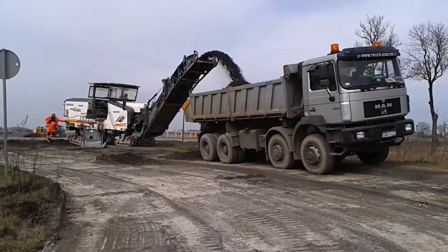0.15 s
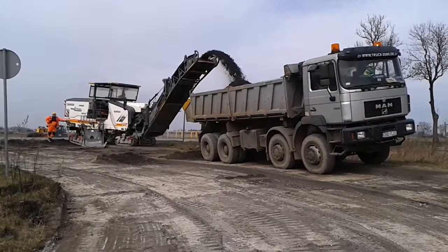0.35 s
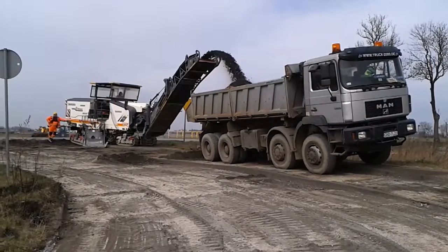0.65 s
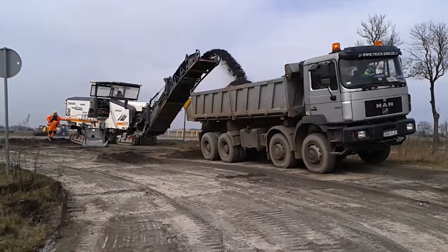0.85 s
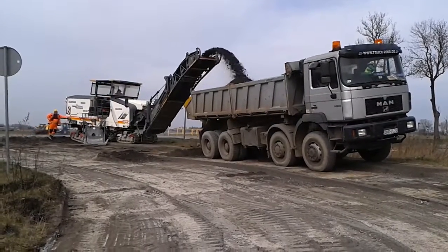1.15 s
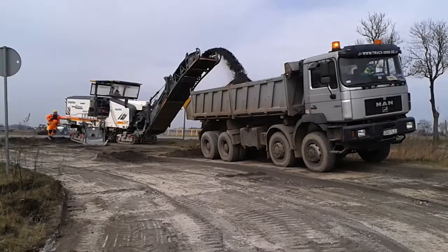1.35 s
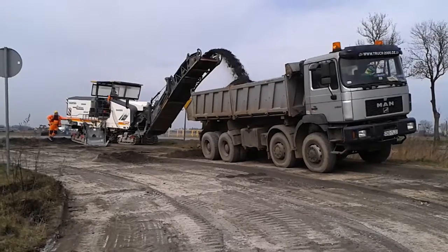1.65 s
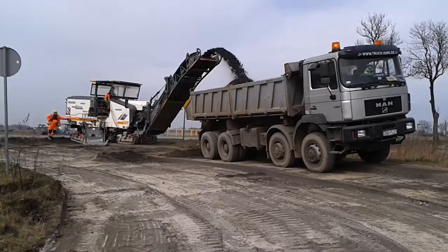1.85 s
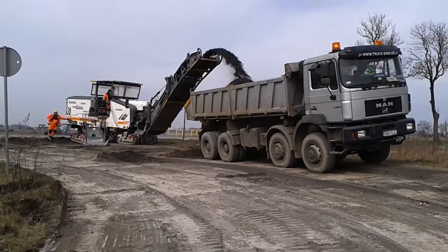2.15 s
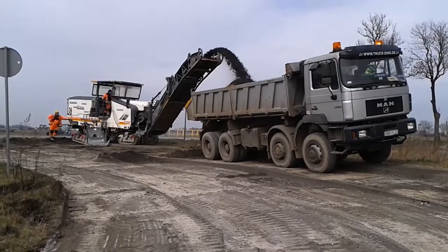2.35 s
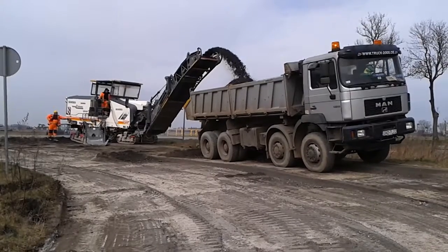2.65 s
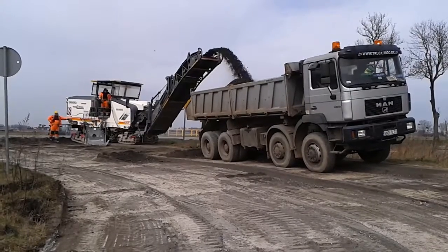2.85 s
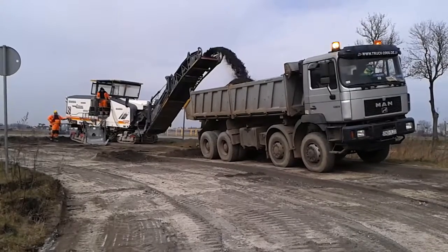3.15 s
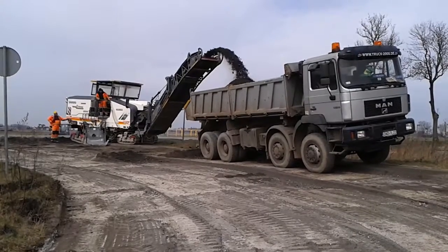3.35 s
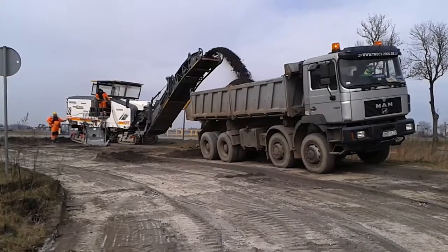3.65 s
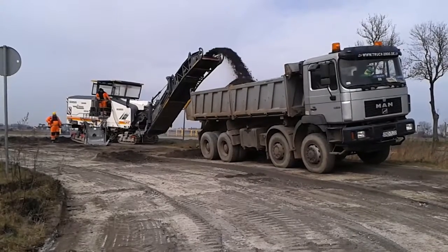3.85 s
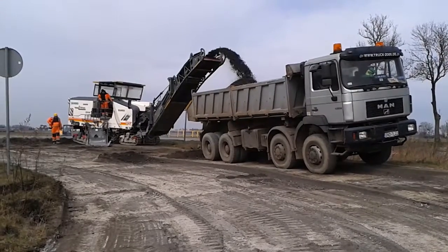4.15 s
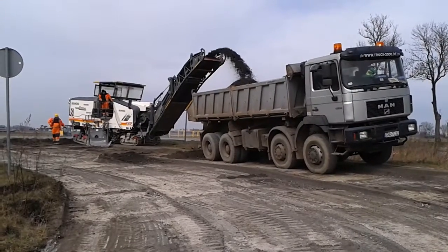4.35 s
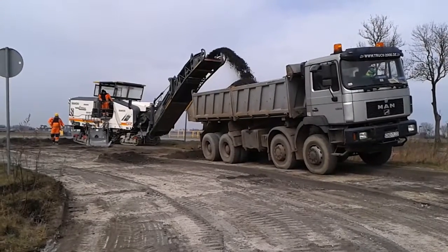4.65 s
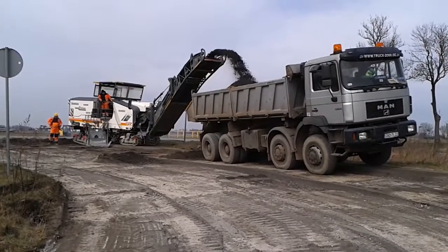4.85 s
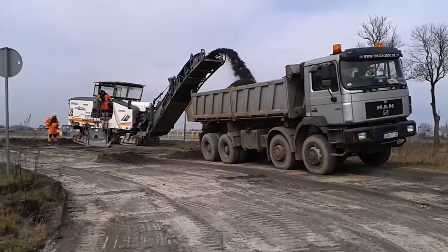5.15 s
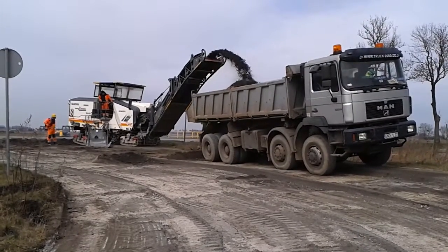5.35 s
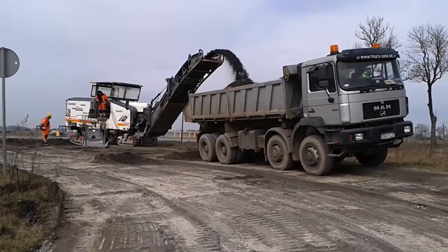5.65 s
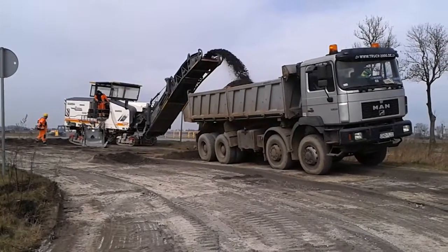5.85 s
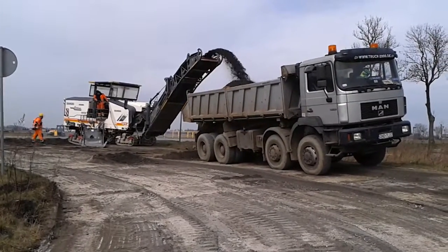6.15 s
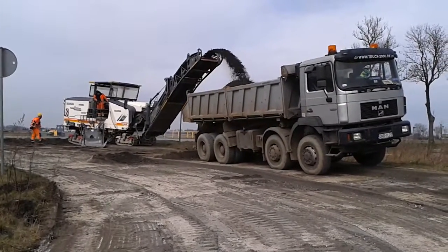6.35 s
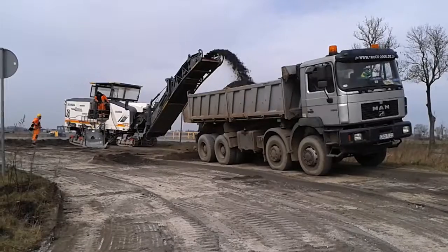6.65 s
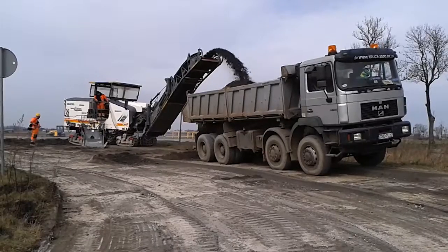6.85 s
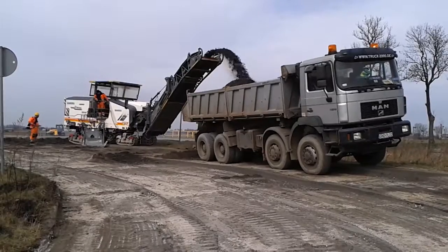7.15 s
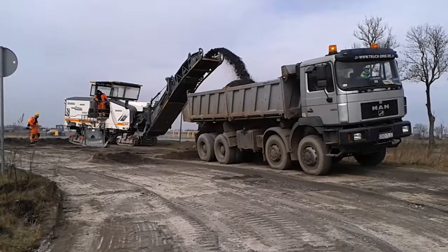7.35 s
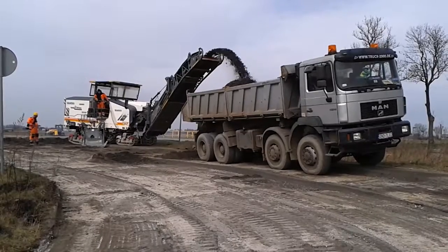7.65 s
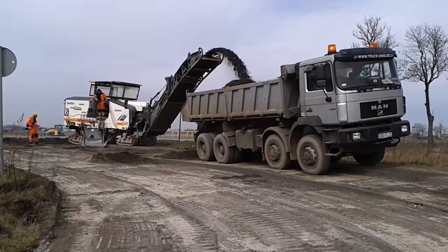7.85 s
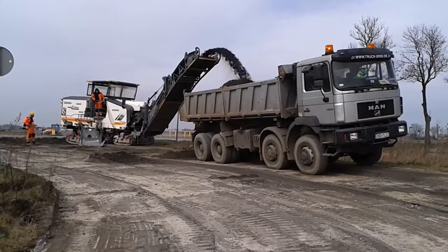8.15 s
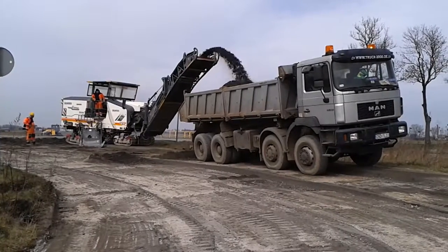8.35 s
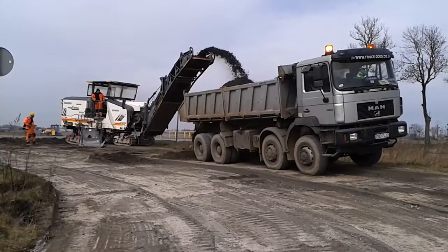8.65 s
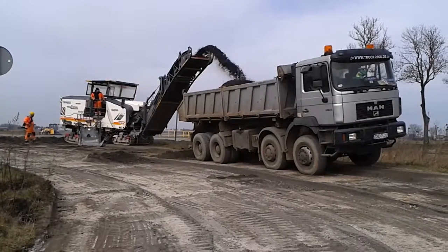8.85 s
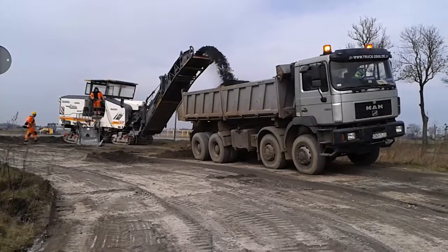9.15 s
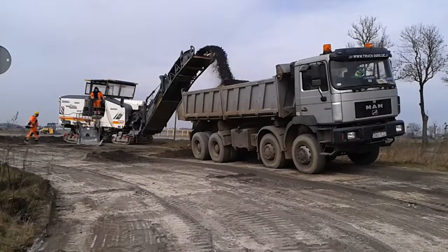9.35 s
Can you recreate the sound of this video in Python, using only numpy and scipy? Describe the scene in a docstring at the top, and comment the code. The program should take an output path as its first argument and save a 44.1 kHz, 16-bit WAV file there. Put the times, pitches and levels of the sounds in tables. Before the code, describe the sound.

Outdoors at a roadworks, a milling machine some way off grinds asphalt with a dense, steady roar and metallic housing ring. A diesel drones inside it while rubble rattles off a belt into a truck idling low. Air hisses up from about one second and cuts off before two; later small stones tick on the steel bed, with one hard crack near seven seconds. One fixed distant microphone, mono.

```python
"""The roar of a cutting drum is heard first, with a diesel droning inside it and rubble rattling off a belt:
a road milling machine, some way off, grinds asphalt and pours it into an idling truck.
Drum and rubble are shaped noise with sparse bursts; the engine and hums are wavering sines.
Air hisses for a moment as a swelling band of noise, and a few stones crack on the steel bed as decaying modes.
"""
import sys
import numpy as np
from scipy import signal
from scipy.fft import rfft, irfft, next_fast_len
from scipy.io import wavfile
from scipy.ndimage import uniform_filter1d

SR = 44100
rng = np.random.default_rng(int(sys.argv[2]) if len(sys.argv) > 2 else 0)


def inscribe(sig):
    """Save sig as 16-bit PCM at rate SR to the path in sys.argv[1].

    A 1-D sig is mono; a 2-D sig holds one channel per row.
    Samples are clipped to [-1, 1] before scaling.
    """
    pcm = np.round(np.clip(np.atleast_2d(sig).T, -1, 1) * 32767)
    wavfile.write(sys.argv[1], SR, pcm.astype(np.int16))


N = 419391  # length in samples

# The drum at work: columns [t/s, low roar level/dB, housing ring level/dB]
DRUM_LEVELS = [(0, -20, -27), (2, -20, -26.5), (4.3, -20.5, -28), (5.5, -21, -27), (7.5, -20, -28),
               (9.51, -21, -27.5)]
# Spectrum of the low roar before panel resonance: columns [f/Hz, relative level per Hz/dB]
ROAR_SPECTRUM = [(30, -47.5), (40, -39), (50, -17.5), (97, -2.5), (140, -2), (172, 1), (275, -2.5),
                 (400, -8.5), (586, -18), (731, -23.5), (822, -15.5), (900, -22.5), (1170, -41.5),
                 (1980, -120)]
# Spectrum of the housing before panel resonance: columns [f/Hz, relative level per Hz/dB]
HOUSING_SPECTRUM = [(350, -42.5), (600, -5), (735, -6.5), (826, -2.5), (1040, 2), (1220, -7), (1430, -3),
                    (1760, -10.5), (1960, -7), (2150, -13.5), (2490, -12.5), (3070, -22.5), (3400, -24),
                    (4420, -50), (7480, -120)]
LURCH_DB, LURCH_HZ = 0.57, 7.9  # the roar lurches as the cut gets harder and softer


def drum():
    """Broadband excitation: teeth bite too densely to count, and the housing panels resonate."""
    roar_db, ring_db = follow(DRUM_LEVELS)
    roar = coloured(rng.standard_normal(N), lambda hz: read(ROAR_SPECTRUM, hz) + panel_lift(hz))
    bites = gain_of(-10.5) * knocks(per_s=150, spread_db=2.7, samples=140.0)
    teeth = patchy(patch_db=0.04, flicker_db=0.13) + bites
    ring = coloured(teeth, lambda hz: read(HOUSING_SPECTRUM, hz) + panel_lift(hz))
    lurching_db = roar_db + LURCH_DB * drift(LURCH_HZ).real
    return swaying(gain_of(lurching_db) * roar + gain_of(ring_db) * ring)


# Resonances of the housing and the belt frame: columns [f/Hz, width/Hz, lift/dB]
PANEL_RESONANCES = [(156, 8, -1), (254, 24, 2.5), (330.5, 12, 2), (382, 17, 3), (542, 27, 2.5),
                    (850, 25, 0), (965, 68, 3), (1068, 36, 3.5), (1180, 29, 0.5), (1440, 48, 2),
                    (1666, 49, 2.5), (1703, 41, 3.5), (1920, 80, 4.5), (1820, 55, 2), (2036, 68, 2.5),
                    (2343, 84, 5), (2572, 74, 5), (2890, 45, 7.5), (3227, 49, 4.5), (3660, 120, 1.5),
                    (4270, 140, 1.5), (4740, 90, 4), (5370, 170, -1.5), (5960, 130, -3)]
SWAY_DB, SWAY_FRAMES = 1.0, 5  # rms sway of each ring, and its averaging time in spectral frames


def panel_lift(hz):
    """Resonance: each panel lifts the spectrum in dB around its own frequency."""
    return sum(lift / (1 + (2 * (hz - f) / width) ** 2) for f, width, lift in PANEL_RESONANCES)


def swaying(x):
    """Time-varying resonance: every panel ring swells and fades by chance as the load shifts."""
    hz, t, spectrum = signal.stft(x, SR, nperseg=2048)
    chance = rng.standard_normal((len(t), len(PANEL_RESONANCES)))
    sway = evened(uniform_filter1d(chance, size=SWAY_FRAMES, axis=0))
    shapes = np.array([1 / (1 + ((hz - f) / width) ** 2) for f, width, _ in PANEL_RESONANCES])
    gain = gain_of(SWAY_DB * sway @ shapes).T
    return signal.istft(spectrum * gain, SR, nperseg=2048)[1][:N]


# Machine diesel under its governor: columns [t/s, shaft speed/turns per s]
SHAFT_SPEED = [(0, 35.15), (1.75, 35.35), (2.75, 35.2), (3.75, 35.5), (4.75, 35.15), (5.5, 34.68),
               (6.9, 34.65), (7.75, 35.2), (8.75, 35.38), (9.51, 35.3)]
# Orders of the shaft: columns [multiple of shaft speed, level relative to FIRING_DB/dB]
ORDER_LEVELS = [(3, -3), (4, -6.5), (4.5, -12), (5, -3.5), (6, -7.5), (6.5, -11), (7.5, -12), (8, -7.5),
                (9.5, -15), (12, -19), (18, -21), (20, -24), (24, -20)]
FIRING_DB = -28.5  # rms reference, before the waver
WAVER_PER_ORDER, WAVER_MOST, WAVER_HZ = 0.17, .65, 7  # depth grows with order up to a limit


def diesel():
    """Order analysis: sines at shaft multiples; uneven combustion wavers their level and phase."""
    turns = shaft_turns()
    orders = 0
    for multiple, db in ORDER_LEVELS:
        depth = min(WAVER_PER_ORDER * multiple, WAVER_MOST)
        waver = 1 + depth * drift(WAVER_HZ)
        tone = np.exp(2j * np.pi * (multiple * turns + rng.random()))
        orders = orders + gain_of(db) * (waver * tone).real
    return np.sqrt(2) * gain_of(FIRING_DB) * orders


def shaft_turns():
    """Phase accumulation: the integral of shaft speed, in turns."""
    speed, = follow(SHAFT_SPEED)
    return np.cumsum(speed) / SR


# Rubble flow off the belt: columns [t/s, level/dB, gain of the top treble/dB]
FLOW_LEVELS = [(0, -35, -5), (1.2, -34, -18.5), (2.2, -35.5, -4), (4.3, -36, 3), (4.9, -35.5, -0.5),
               (6.6, -37, 4.5), (9.0, -36, -1), (9.51, -36, 3)]
# Spectrum of the rubble before panel resonance: columns [f/Hz, relative level per Hz/dB]
RUBBLE_SPECTRUM = [(1800, -31), (3000, -12.5), (3470, -10.5), (3810, -4), (4840, -3), (6180, -0.5),
                   (6600, -3), (8300, -18), (9000, -26), (9300, -39), (9700, -36.5), (14000, -75)]
CLATTER_DEPTH = .045  # the rattle throbs with each turn of the shaft


def rubble():
    """Dense random impacts: a patchy rattle with sparser, sharper chips; its top treble flickers."""
    level_db, top_db = follow(FLOW_LEVELS)
    chips = gain_of(-8.0) * knocks(per_s=250, spread_db=5.0, samples=80.)
    fall = patchy(patch_db=0.7, flicker_db=0.6) + chips
    rattle = coloured(fall, lambda hz: read(RUBBLE_SPECTRUM, hz) + panel_lift(hz))
    rattle = rattle * (1 + CLATTER_DEPTH * np.cos(2 * np.pi * shaft_turns()))
    high_pass = signal.butter(4, 7600, "high", fs=SR, output="sos")
    top = signal.sosfiltfilt(high_pass, rattle)
    top_gain = gain_of(top_db + 3.0 * drift(20).real)
    return gain_of(level_db) * (rattle + (top_gain - 1) * top)


# Stones on the steel bed: columns [t/s, peak level of the clack/dB, pitch factor]
STONE_BLOWS = [(2.247, -25, 1.04), (3.007, -26, 1.03), (3.343, -24, 1.04), (3.573, -26, 1.12),
               (3.578, -25, 1.08), (3.765, -25, .92), (4.149, -26, .9), (4.465, -23, 1.1),
               (4.472, -24, .98), (5.279, -25, 1.1), (6.832, -19, 1.08), (6.837, -20, 1.12),
               (6.842, -18, 1.04), (6.849, -23, 1.15), (7.0314, -17, 1.02), (7.0331, -7, 1.0),
               (7.0371, -11, 1.0), (7.0428, -17, 1.02), (7.2572, -21, 1.12), (7.265, -25, 1.1),
               (7.55, -23, 1.06), (7.961, -28, 1.15), (9.355, -25, .94), (9.491, -19.5, 1.03)]
# Modes of the steel bed before the pitch factor: columns [f/Hz, relative level/dB, t60/s]
BED_MODES = [(2050, -13, .012), (2380, -9, .02), (2800, -6, .02), (3250, -12, .02), (3720, -11, .02),
             (4200, -18, .02), (5000, -9, .02), (5300, 0, .03), (5800, 0, .028), (6250, -7, .022),
             (6620, -7, .025), (7000, -10, .025), (7650, -15, .022), (9320, -24, .03)]
MIDDLE_HZ = 4500, 8500  # light stones sound mainly the modes in this range
HARD_DB = -8  # a blow this strong sounds all modes of the bed in full
SCATTER_DB, SCATTER_T60_S = -21, .095  # splinters: starting rms against the clack peak, and decay
RISE_S = .0004


def stones():
    """Modal synthesis: each stone rings the bed in a sharp clack; a patter of splinters follows."""
    size = 4096  # samples in one blow
    out, t, hz = np.zeros(N + size), np.arange(size) / SR, np.fft.rfftfreq(size, 1 / SR)
    f, mode_db, t60 = np.transpose(BED_MODES)[:, :, None]
    outer = (f < MIDDLE_HZ[0]) | (f > MIDDLE_HZ[1])
    rise = np.sin(np.pi / 2 * np.minimum(t / RISE_S, 1)) ** 2
    bursts = rng.standard_normal((len(STONE_BLOWS), size))
    for (s, db, factor), burst in zip(STONE_BLOWS, bursts):
        outer_gain = min(gain_of(0.98 * (db - HARD_DB)), 1)
        strength = gain_of(mode_db) * np.where(outer, outer_gain, 1)
        modes = strength * gain_of(-60 * t / t60) * np.sin(2 * np.pi * f * factor * t)
        clack = modes.sum(axis=0)
        # the splinters take their colour from the same modes
        colour = (strength / (1 + ((hz - f * factor) / 300) ** 4)).sum(axis=0)
        splinters = evened(irfft(rfft(burst) * colour, size))
        patter = splinters * gain_of(SCATTER_DB - 60 * t / SCATTER_T60_S)
        blow = rise * (clack / abs(rise * clack).max() + patter)
        out[round(s * SR):][:size] += gain_of(db) * blow
    return out[:N]


AIR_OPEN_S, AIR_SHUT_S, AIR_CLOSING_S = .9, 1.885, .015
AIR_DB, AIR_SWELL = -37.5, .6  # level just before shutting; power law of the swell


def air():
    """Jet noise: smooth hiss from a valve that swells and shuts at once."""
    times = [AIR_OPEN_S, AIR_SHUT_S, AIR_SHUT_S + AIR_CLOSING_S]
    opening = np.interp(np.arange(N) / SR, times, [0, 1, 0])

    def jet_db(hz):
        """Spectral shaping: a broad hump near 5200 Hz with a steep upper limit."""
        return -12 * np.log2((hz + 1) / 5200) ** 2 - 60 * (hz / 9000) ** 8

    hiss = coloured(rng.standard_normal(N), jet_db)
    return gain_of(AIR_DB) * opening ** AIR_SWELL * hiss


# Idling truck and low hums: columns [f/Hz, nominal level/dB, waver width/Hz]
HUM_TONES = [(50.7, -51, 1.4), (56.5, -47, 2), (59.8, -46.5, 2.2), (75, -38.5, 1.8), (481, -48, 4.1),
             (1076, -47, 15)]


def hums():
    """Narrow-band tones: each line is part clean sine, part wandering in level and phase."""
    t = np.arange(N) / SR
    total = 0
    for hz, db, width in HUM_TONES:
        waver = 1 + 0.89 * drift(width)
        tone = np.exp(2j * np.pi * (hz * t + rng.random()))
        total = total + gain_of(db) * (waver * tone).real
    return total


WIND_DB = -63  # faint low buffeting at the microphone


def wind():
    """Turbulent pressure: lumpy noise at the very bottom of the range."""
    rumble = coloured(rng.standard_normal(N), lambda hz: -np.minimum((hz / 45) ** 4, 80))
    return gain_of(WIND_DB) * abs(drift(1.5)) * rumble


def gain_of(db):
    """Level definition: decibels to an amplitude factor."""
    return 10 ** (np.asarray(db) / 20)


def evened(x):
    """Energy normalisation: scales to rms 1."""
    return x / np.sqrt(np.mean(x ** 2) + 1e-20)


def read(points, hz):
    """Spectral envelope: interpolates a spectrum table on a log-frequency axis."""
    f, value = np.transpose(points)
    return np.interp(np.log(hz + 1), np.log(f + 1), value)


def follow(rows):
    """Time envelope: the columns of a curve table at every sample."""
    s, *columns = np.transpose(rows)
    return [np.interp(np.arange(N) / SR, s, c) for c in columns]


def drift(hz):
    """Narrow-band random modulation: slow complex chance of rms 1 and the given bandwidth."""
    steps = rng.standard_normal((N // 64 + 2, 2)) @ [1, 1j]  # one step per 64 samples
    pole = np.exp(-np.pi * hz * 64 / SR)
    once = signal.lfilter([1], [1, -pole], steps)
    slow = signal.lfilter([1], [1, -pole], once)
    at, grid = np.arange(N) / 64, np.arange(len(slow))
    smooth = np.interp(at, grid, slow.real) + 1j * np.interp(at, grid, slow.imag)
    return smooth / np.sqrt(np.mean(abs(slow) ** 2))


def coloured(x, shape_db):
    """Linear filtering: shapes x by a dB curve given as a function of Hz, then sets rms 1."""
    size = next_fast_len(N)
    gain = gain_of(shape_db(np.fft.rfftfreq(size, 1 / SR)))
    return evened(irfft(rfft(x, size) * gain, size)[:N])


def patchy(patch_db, flicker_db, size=512):
    """Non-stationary noise: its level drifts in time-frequency patches and flickers over all bands."""
    frames, bins = N * 4 // size + 5, size // 2 + 1
    a, b, patches = rng.standard_normal((frames, bins, 3)).T
    patches = uniform_filter1d(patches, size=8, axis=0)  # along frequency
    patches = evened(uniform_filter1d(patches, size=16, axis=1))  # along time
    flicker = evened(uniform_filter1d(rng.standard_normal(frames), size=12))
    spectrum = (a + 1j * b) * gain_of(patch_db * patches + flicker_db * flicker)
    return evened(signal.istft(spectrum, nperseg=size, noverlap=size * 3 // 4)[1][:N])


def knocks(per_s, spread_db, samples):
    """Poisson impacts: sparse noise bursts of widely spread size, decaying by 1/e in 'samples'."""
    sizes = gain_of(spread_db * np.minimum(rng.exponential(1, N), 3.1))
    hits = sizes * (rng.random(N) < per_s / SR)
    envelope = signal.lfilter([1], [1, -np.exp(-1 / samples)], hits)
    return evened(envelope * rng.standard_normal(N))


def scene():
    """Superposition: the pressures of all sources add at one microphone."""
    return (drum() + diesel() + rubble() + stones() + air() + hums() + wind())[None]


EDGE_HZ = 11612


def record(dry):
    """Band limiting: a linear-phase low-pass removes everything well above the edge."""
    low_pass = signal.firwin(511, EDGE_HZ, window=("kaiser", 9), fs=SR)
    return signal.oaconvolve(dry, low_pass[None], "same")


dry = scene()
out = record(dry)
inscribe(out)
```